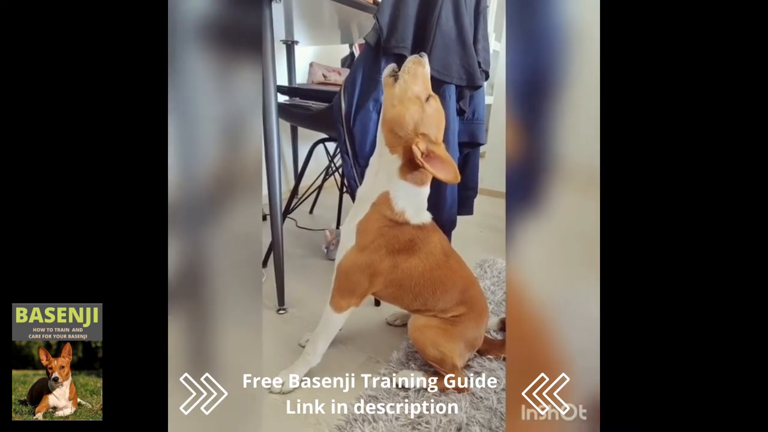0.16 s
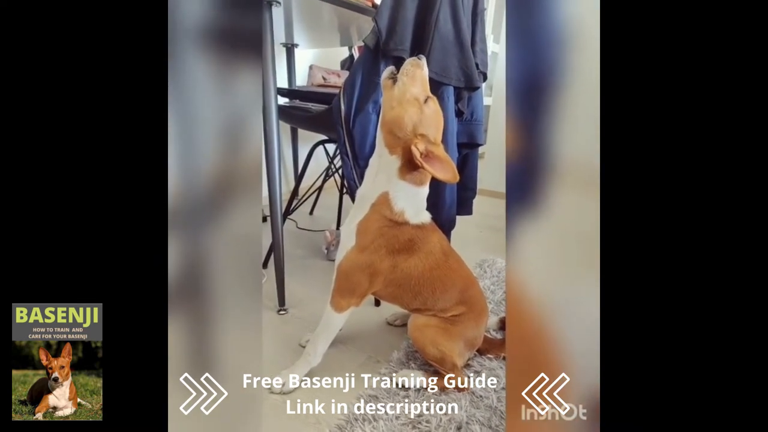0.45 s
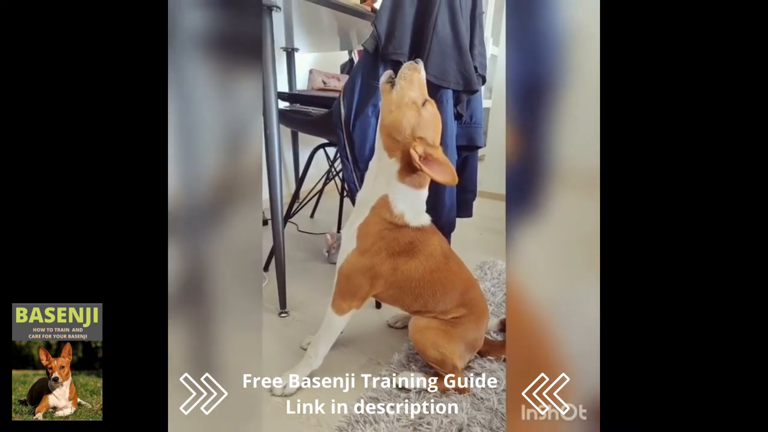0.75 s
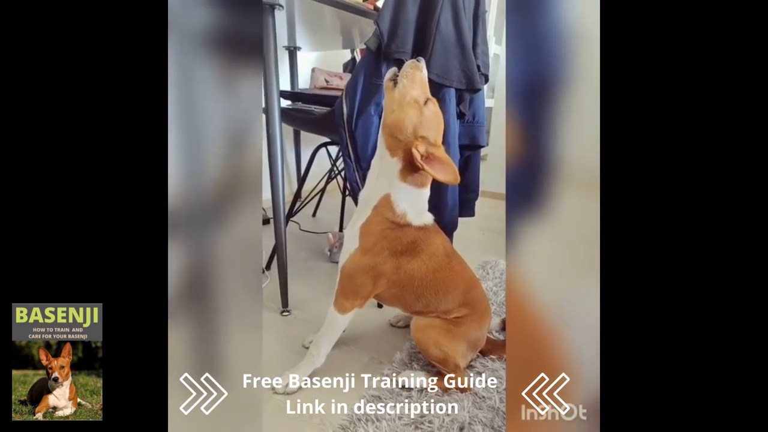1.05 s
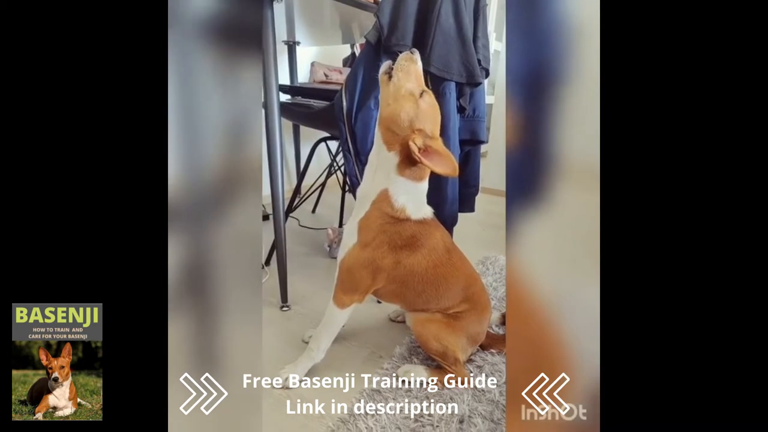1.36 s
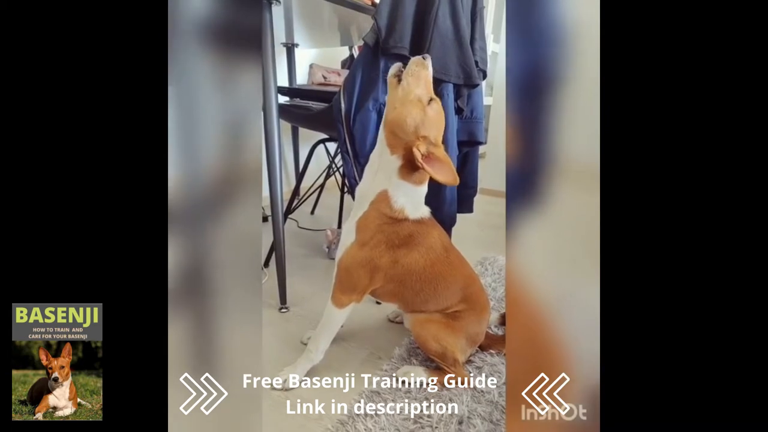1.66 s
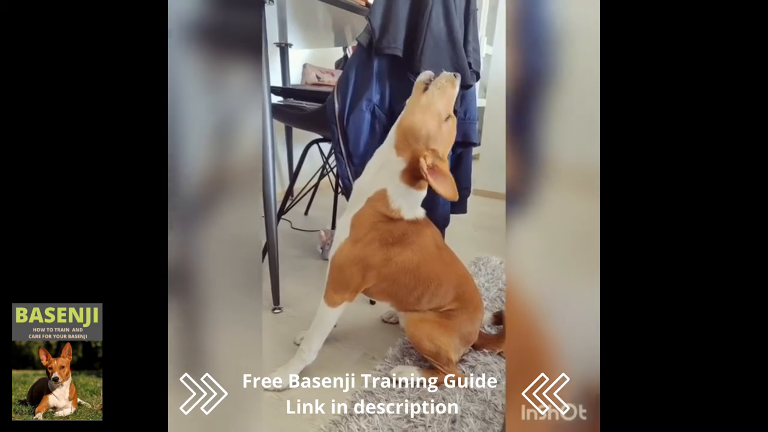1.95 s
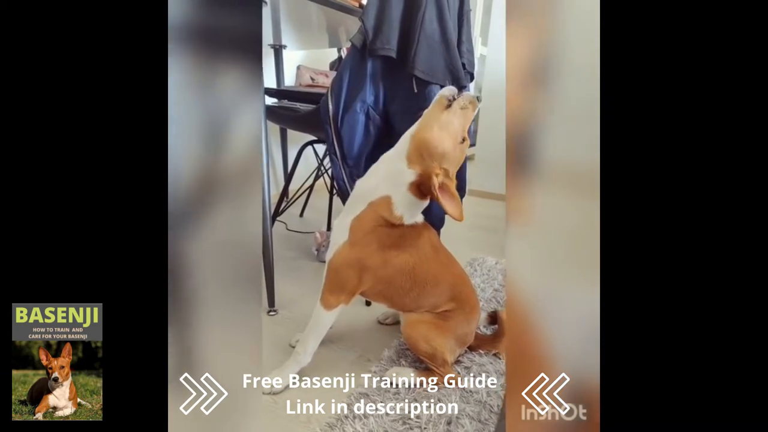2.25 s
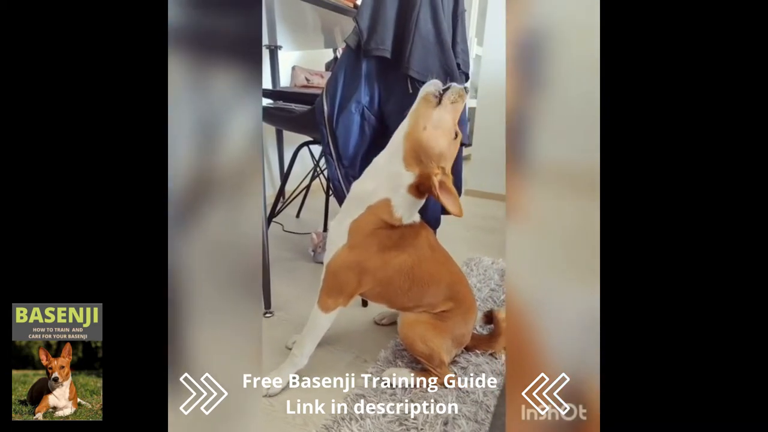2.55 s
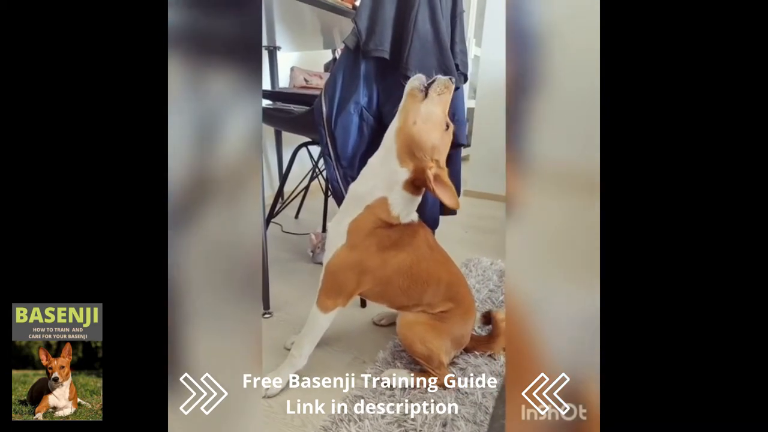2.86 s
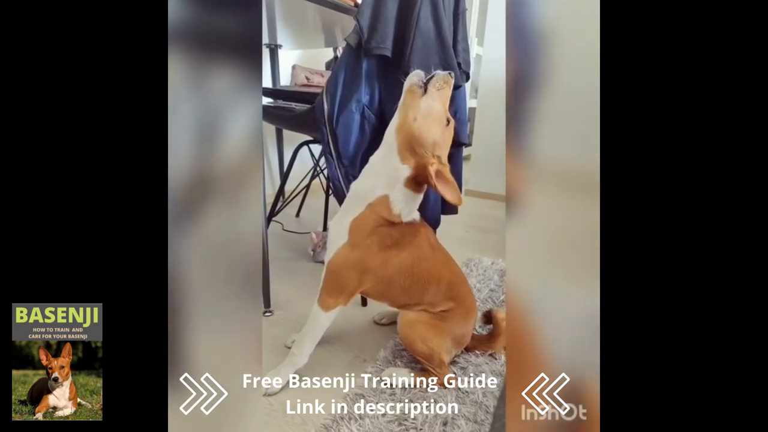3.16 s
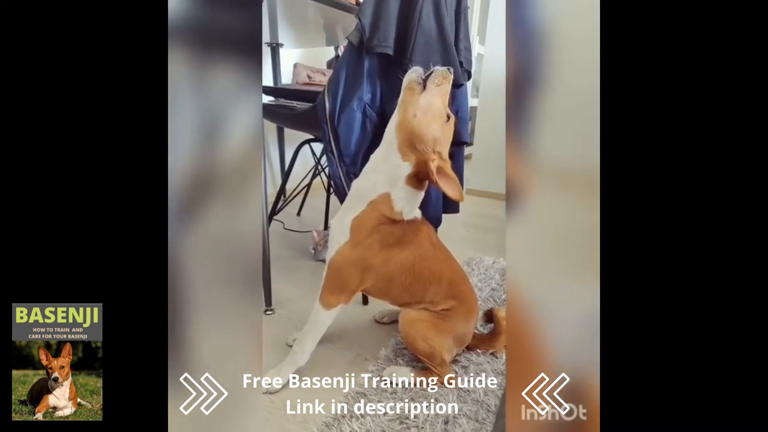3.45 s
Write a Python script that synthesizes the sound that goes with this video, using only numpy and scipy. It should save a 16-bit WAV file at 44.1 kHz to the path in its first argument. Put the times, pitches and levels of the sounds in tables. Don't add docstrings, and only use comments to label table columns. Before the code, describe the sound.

Dog howling in a small room: one long drooping note, then a yodelling second call climbing upward.

```python
import sys
import numpy as np
from scipy import signal
from scipy.io import wavfile
from scipy.ndimage import uniform_filter1d

SR = 44100
rng = np.random.default_rng(int(sys.argv[2]) if len(sys.argv) > 2 else 0)


def store_wav(level_fs):
    pcm = np.round(np.clip(np.atleast_2d(level_fs), -1, 1) * 32767)
    wavfile.write(sys.argv[1], SR, pcm.T.astype(np.int16))


def ratio(d):
    e = np.asarray(d, float) / 20
    return 10 ** e


N = 158760

# f/Hz, level/dB per Hz
AIR_SPECTRUM = [(25, -8), (250, -3.5), (550, -12), (1100, -12), (2000, -19), (4800, -30.5), (7000, -27),
                (13000, -37.5)]
# f/Hz, likeness/1
AIR_LIKENESS = [(60, 0.92), (170, 0.93), (500, 0.86), (1440, 0.075), (4150, 0.13)]
# f/Hz, width/Hz, level/dB
HUM_BANDS = [(38, 8, -67.5), (65, 7.3, -69), (105, 14, -65), (150, 20, -66.5), (210, 14, -70.5),
             (303, 30, -64)]
# f/Hz, T60/s
ROOM_T60_S = [(300, .45), (600, .38), (1100, .55), (4000, .45), (10000, .1)]

# start t/s, end t/s, level/dB
RASP_SPANS = [
    (.955, 1.085, -46),
    (1.105, 1.125, -50),
    (2.085, 2.19, -50),
    (2.59, 2.64, -37),
    (2.65, 2.74, -46),
]
# f/Hz, width/Hz, level/dB
RASP_THROAT = [(900, 200, 0), (1150, 120, -8), (1920, 200, -8), (2350, 200, -16), (3120, 220, -13),
               (4300, 160, -26)]
# t/s, level/dB
CROAK_PULSES = [(2.046, -37.5), (2.053, -35), (2.061, -39.5), (2.067, -35.5), (2.073, -26.5), (2.079, -30),
                (2.084, -24.5), (2.09, -32.5), (2.096, -22.5), (2.104, -35.5)]
# f/Hz, width/Hz, level/dB
CROAK_THROAT = [(250, 140, 1), (332, 360, 1.5), (780, 110, 11.5), (1240, 180, -18)]

# t/s, fold pitch f/Hz, fundamental level/dB, octave level/dB, upper overtones level/dB,
# breath level/dB, head turn left-right level/dB
HELD_CALL = [(0.0, 630.9, -17, -39.5, -20, -40.5, 10.5), (0.25, 626.1, -15, -37, -21, -43.5, 6),
             (0.41, 614.5, -13, -38, -23.5, -41.5, 0), (0.608, 608.6, -11, -52.5, -26.5, -42.5, 2.5),
             (0.645, 601.4, -12.5, -58, -29, -44, 1.5), (0.75, 596.3, -12.5, -49.5, -24.5, -44, 4),
             (0.846, 585, -13.5, -35.5, -34.5, -51.5, 5.5), (0.945, 575.8, -19, -41, -34, -51, 4),
             (0.972, 562.5, -24.5, -35, -39.5, -46.5, 8.5), (1.06, 561.5, -26.5, -44, -41, -46, 1.5),
             (1.122, 580, -26, -62, -56, -57, 7.5)]
RISING_CALL = [
    (2.112, 375.5, -31, -28, -49, -43.5, 2.5),
    (2.16, 411.9, -43.5, -16.5, -49, -43, -3),
    (2.294, 461.8, -29.5, -25, -40, -46, -18),
    (2.366, 498.3, -27.5, -34, -34.5, -43.5, 17),
    (2.404, 531.6, -20, -28, -33, -40, 0.5),
    (2.49, 579.8, -10.5, -44, -36, -42, 7.5),
    (2.556, 587, -11, -48, -29.5, -38, 5),
    (2.622, 582.2, -11.5, -39.5, -39.5, -40.5, 7),
    (2.635, 601, -19, -48, -41.5, -45.5, -5),
]
HIGH_CALL = [
    (2.64, 388.7, -39, -12, -35, -28.5, 0.5),
    (2.668, 389.1, -35.5, -9.5, -33, -31, 2.5),
    (2.75, 397.8, -36, -9, -34, -35, 4.5),
    (2.765, 403.3, -29, -12, -34, -41.5, -3),
    (2.79, 407.2, -35.5, -9, -33, -54, 1),
    (2.952, 417.5, -33, -10, -32, -44, -3),
    (3.05, 425.2, -34.5, -13.5, -33.5, -49.5, -15.5),
    (3.15, 429.5, -42, -12.5, -35, -49, -16),
    (3.272, 433.3, -40, -11, -35, -57, -7.5),
    (3.59, 432.3, -37, -11, -33.5, -55, -6),
]
# f/Hz, width/Hz, level/dB
NARROW_THROAT = [(1833, 300, 2), (2350, 520, -22), (3067, 260, -11.5), (4242, 310, -19), (4820, 320, -39)]
# f/Hz, width/Hz, level/dB
OPENING_THROAT = [(1384, 230, -2), (1826, 540, -5), (2003, 180, -2), (2334, 300, -5), (2970, 580, -6.5),
                  (3383, 290, -16), (4298, 190, -18), (4670, 230, -28.5)]
# f/Hz, width/Hz, level/dB
WIDE_THROAT = [(1300, 440, -5.5), (1734, 900, -4), (1933, 160, -5.5), (2596, 240, -14.5), (3086, 285, -2.5),
               (4289, 170, -9)]
# f/Hz, width/Hz, level/dB
NOSE_RINGS = [(6470, 690, -44), (8420, 920, -41.5), (10980, 700, -39), (12060, 600, -39.5)]
# f/Hz, width/Hz, level/dB
BREATH_RINGS = [(658, 94, -4.5), (805, 81, -1.5), (908.5, 81, -3), (976, 80, -14.5), (1820, 120, -19),
                (3130, 180, -27.5), (4380, 96, -34), (6800, 540, -38.5), (9300, 1500, -32.5),
                (11800, 900, -36)]
# f/Hz, phase/rad
PORT_LEAD_RAD = [(600, 0.16), (900, 0.23), (1250, 1.1), (1850, 2.2), (3050, 4.49), (4300, 6.5)]
# f/Hz, left-right level/dB
PORT_LEVEL_DB = [(1000, 1), (1850, -1.5), (3050, -3), (4300, 1.5), (8000, -2), (12000, -2.5)]
# t/s, loud line lead/rad, ringing band lead/rad
HEAD_TWIST = [(0, -.3, 4), (.34, -0.036, 3), (.42, -0.56, 0.4), (.58, -0.18, 1.2), (.68, -.5, 3),
              (.9, 0.066, 4), (.98, 1.1, -0.3), (1.15, 0.7, 1), (2.14, 0.39, 1.33), (2.85, -.2, 1.7),
              (3.04, -0.6, 4), (3.13, 0.7, 3.5), (3.2, 1.88, 3.5), (3.6, 1.85, 2.5)]

# f/Hz, level/dB
BIN_GATE_DB = [(120, -58.5), (350, -52), (1300, -51.5), (2500, -59), (5000, -71.5), (6200, -74.5),
               (9000, -75), (10000, -66.5), (13000, -74)]
# f/Hz, level/dB
BAND_GATE_DB = [(1000, -80), (1300, -52), (2500, -53), (5000, -55), (5600, -90)]

RISE_S, FALL_S = 0.012, 0.014
TOP_HZ = 12900


def evened(x):
    return x / np.sqrt(np.mean(x ** 2) + 1e-20)


def read(points, hz):
    f, value = np.transpose(points)
    return np.interp(np.log(hz + 1), np.log(f + 1), value)


def resonate(x, hz, width_hz):
    turn = np.exp(2j * np.pi * hz * np.arange(x.shape[-1]) / SR)
    r = np.exp(-np.pi * width_hz / SR)
    return 2 * (turn * signal.lfilter([1 - r], [1, -r], x / turn + 1e-18)).real


def resonate_twice(x, hz, width_hz):
    return resonate(resonate(x, hz, width_hz), hz, width_hz)


def wander(size, rate_hz, count=1):
    f = np.geomspace(rate_hz / 8, rate_hz, 12)[:, None] * 32 / SR
    phase = f * np.arange(size) + rng.random((count, 12, 1))
    return np.sin(2 * np.pi * phase).sum(1) / np.sqrt(6)


def bump(hz, centre_hz, width_hz):
    return (1 + (2 * (hz - centre_hz) / width_hz) ** 2) ** -1.3


def cavity(hz, rings):
    return sum(ratio(db) * bump(hz, c, w) for c, w, db in rings)


def air():
    level_db, patch_db = -55, 2.2
    shuffle_s, shuffle_width_s, shuffle_db = 2.2, 0.49, 5.5
    frames, hz = N // 256 + 5, np.fft.rfftfreq(1024, 1 / SR)
    a, b, c, d, patches = rng.standard_normal((frames, 513, 5)).T
    patches = evened(uniform_filter1d(uniform_filter1d(patches, 8, 0), 7, 1))
    same = np.clip(read(AIR_LIKENESS, hz), -1, 1)[:, None]
    left = a + 1j * b
    right = same * left + np.sqrt(1 - same ** 2) * (c + 1j * d)
    z = np.array([left, right]) * ratio(read(AIR_SPECTRUM, hz)[:, None] + patch_db * patches)
    hiss = signal.istft(z, nperseg=1024, noverlap=768)[1][:, :N]

    noise = rng.standard_normal(N) + 0.32 * rng.standard_normal((2, N))
    hums = sum(ratio(db) * evened(resonate_twice(noise, c, w)) for c, w, db in HUM_BANDS)
    swell = np.exp(-((np.arange(N) / SR - shuffle_s) / shuffle_width_s) ** 2)
    return ratio(level_db) * evened(hiss) + hums * ratio(shuffle_db * swell)


def room(x):
    mode_hz, mode_width_hz, mode_gain = 1150, 160, 5.5
    taps = np.zeros((2, SR // 2))
    at = np.arange(300, SR // 2 - 20, 20) + rng.integers(0, 20, (2, (SR // 2 - 301) // 20))
    np.put_along_axis(taps, at, rng.choice([-1., 1.], at.shape), 1)
    hz, t, z = signal.stft(taps, SR, nperseg=256)
    decay = ratio(-60 * t / read(ROOM_T60_S, hz)[:, None])
    tail = signal.istft(z * decay, SR, nperseg=256)[1]
    x = x + mode_gain * resonate_twice(x, mode_hz, mode_width_hz)
    return signal.fftconvolve(x, tail / np.linalg.norm(tail[0]), axes=1)[:, :N]


def rasp():
    t = np.arange(N) / SR
    level = 0
    for start_s, end_s, db in RASP_SPANS:
        ramps = np.minimum((t - start_s) / 0.012, (end_s - t) / 0.022 + 1)
        level = level + ratio(db) * np.clip(ramps, 0, 1)
    puffs = np.interp(t, t[::32], ratio(3.1 * wander(len(t[::32]), 160)[0]))
    noise = puffs * (rng.standard_normal(N) + 0.74 * rng.standard_normal((2, N)))
    rung = sum(ratio(db) * resonate(resonate_twice(noise, c, w), c, w) / np.sqrt(w)
               for c, w, db in RASP_THROAT)
    return level * evened(rung)


def croak():
    clicks = np.zeros(N)
    for s, db in CROAK_PULSES:
        clicks[round(s * SR)] = ratio(db)
    puff = np.convolve(clicks, np.exp(-np.arange(600) / 200))[:N]
    clicks = clicks + 0.037 * rng.standard_normal(N) * puff
    clicks = np.convolve(clicks, np.hanning(36) / 18)[:N]
    return sum(ratio(db) * resonate_twice(clicks, c, w) * SR / (np.pi * w) for c, w, db in CROAK_THROAT) / 2


def breath(size):
    noise = rng.standard_normal((3, size))
    noise = noise[2] + 0.3 * noise[:2]
    return evened(sum(ratio(db) * resonate_twice(noise, c, w) / np.sqrt(w) for c, w, db in BREATH_RINGS))


def howl(curve, throat, cracks=False, holds=False):
    s, *cols = np.transpose(curve)
    fine = np.arange(max(s[0] - RISE_S, 0), s[-1] + FALL_S, 1 / SR)
    t = fine[::32]
    size = len(t)
    hz, low_db, octave_db, upper_db, breath_db, turn_db = (np.interp(t, s, c) for c in cols)
    twist_s, *leads = np.transpose(HEAD_TWIST)
    loud_lead, ring_lead = (np.interp(t, twist_s, c) for c in leads)

    crack_from_s, crack_to_s = 2.56, 2.6
    crack = cracks * np.clip((t - crack_from_s) / (crack_to_s - crack_from_s), 0, 1)
    jitter = 0.0025 * wander(size, 60)[0]
    hz = hz * (1 + jitter + 0.006 * crack ** 4 * wander(size, 150)[0])
    throb_db = 4.5 * wander(size, 70)[0].clip(-3, 1)
    half = ratio(-26 * (1 - crack) + throb_db) * (crack > 0)
    turns = np.cumsum(np.interp(fine, t, hz)) / SR

    stack = np.sqrt(sum(cavity(k * hz, throat) ** 2 for k in range(3, 12)))
    effort_db = (upper_db - np.percentile(upper_db, 80)).clip(-40, 0)
    nose_level = ratio(-27.0 + 1.5 * effort_db)
    onset = holds * np.clip(1 - (t - s[0]) / 0.35, 0, 1)

    voice = np.zeros((2, len(fine)))
    for k in np.r_[1:TOP_HZ // hz.min(), np.arange(0.5, 7 * cracks)]:
        f = k * hz
        pocket = 1 - 0.34 * bump(f, 3690, 500)
        gain = ratio(upper_db) / stack * cavity(f, throat) + nose_level * cavity(f, NOSE_RINGS)
        gain = gain * (f < TOP_HZ) * pocket
        if k % 1:
            gain = half * (gain + ratio(-18) * bump(f, 890, 200))
        elif k < 3:
            gain = ratio(low_db if k == 1 else octave_db)
        gain = gain * ratio(-9 * onset * np.clip((f - 3500) / 400, 0, 1))

        main = np.clip((1050 - f) / 100, 0, 1)
        ring = np.exp(-((f - 1750) / 454) ** 4)
        weak_turn = 2.4 if holds and k == 1 else 1
        head_db = main * (turn_db - 2.0) * (k % 1 == 0) * weak_turn
        pan = ratio(head_db + (2.5 - main) * read(PORT_LEVEL_DB, f))
        drift = wander(size, 7, count=4) * (1 - 0.92 * main) * (1 - 0.8 * ring)
        side = gain * 2 * np.array([pan, np.ones(size)]) / (1 + pan)
        side = side * ratio(2.5 * drift[:2])
        unrest = (1 - main) * (2.2 if cracks else 1)
        chop_db, grain_db = 1.4 * wander(size, 40.05)[0], 0.3 * wander(size, 300)[0]
        side = side * ratio(unrest * (chop_db + grain_db))

        lead = (1 - ring) * read(PORT_LEAD_RAD, f) + main * loud_lead + ring * ring_lead
        lead = lead * np.array([[0.5], [-0.5]]) + 0.55 * drift[2:] + 2 * np.pi * rng.random()
        for ear in (0, 1):
            phase = 2 * np.pi * k * turns + np.interp(fine, t, lead[ear])
            voice[ear] += np.sqrt(2) * np.interp(fine, t, side[ear]) * np.cos(phase)

    breath_level = ratio(breath_db) + ratio(-40) * crack ** 4
    voice += np.interp(fine, t, breath_level) * breath(len(fine))
    edge = np.clip((t - s[0]) / RISE_S + 1, 0, 1) * np.clip((s[-1] - t) / FALL_S + 1, holds, 1)
    shimmer = ratio(0.3 * wander(size, 50)[0])
    out, at = np.zeros((2, N + SR)), round(t[0] * SR)
    out[:, at:at + len(fine)] = voice * np.interp(fine, t, edge * shimmer)
    return out[:, :N]


def scene():
    room_db, duck_ratio, duck_from_db = -26, 0.35, -18.5
    dog = howl(HELD_CALL, NARROW_THROAT)
    dog = dog + howl(RISING_CALL, OPENING_THROAT, cracks=True)
    dog = dog + howl(HIGH_CALL, WIDE_THROAT, holds=True)
    dog = dog + croak() + rasp()
    loud_db = 10 * np.log10(abs(uniform_filter1d(dog[1] ** 2, 4000)) + 1e-9)
    duck = ratio(-duck_ratio * np.maximum(loud_db - duck_from_db, 0))
    tail = room(dog[:1] * 0.35 + dog[1:] * 2.0)
    return dog + ratio(room_db) * tail + air() * duck


def top_cut(x):
    return signal.sosfilt(signal.butter(12, 13070, fs=SR, output="sos"), x)


def record(dry):
    cut_db, holes_from_hz, holes_db = -34.5, 5400, 0.5
    hz, t, z = signal.stft(dry, SR, nperseg=1024, noverlap=768)
    power = (abs(z) ** 2).mean(0)
    power = uniform_filter1d(uniform_filter1d(power, size=5, axis=0), size=3, axis=1)
    loudest = power.max(0)
    weak = power < loudest * ratio(2 * read(BIN_GATE_DB, hz))[:, None]
    floor = np.percentile(power, 25, axis=1) * ratio(2 * holes_db) * (hz > holes_from_hz)
    weak = weak | (power < floor[:, None])
    bands = np.repeat(power[1:].reshape(64, 8, -1).max(1), 8, axis=0)
    weak[1:] |= bands < loudest * ratio(2 * read(BAND_GATE_DB, hz[1:]))[:, None]
    gain = np.where(weak, ratio(cut_db), 1)
    kept = signal.istft(z * gain, SR, nperseg=1024, noverlap=768)[1][:, :N]
    return top_cut(kept)


dry = scene()
out = record(dry)
store_wav(out)
```